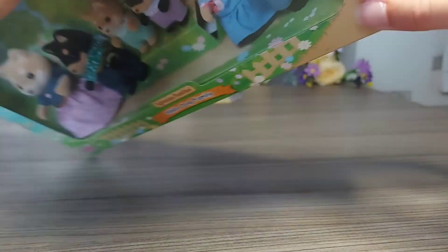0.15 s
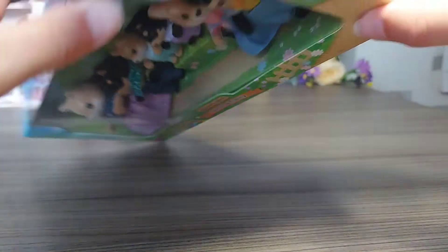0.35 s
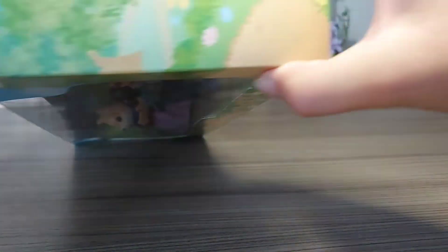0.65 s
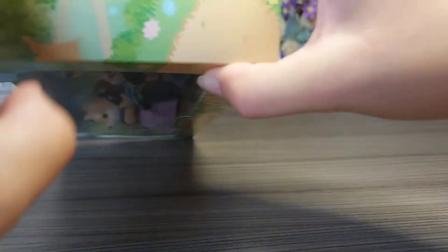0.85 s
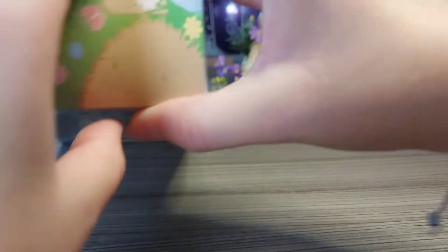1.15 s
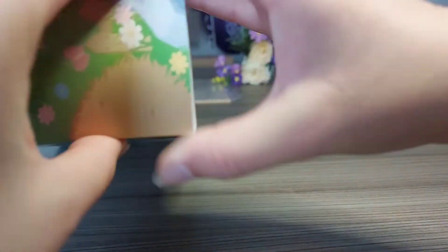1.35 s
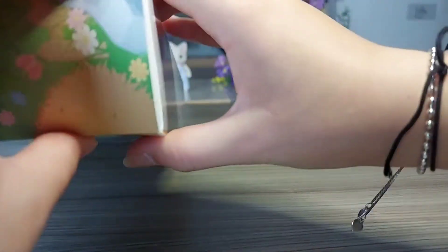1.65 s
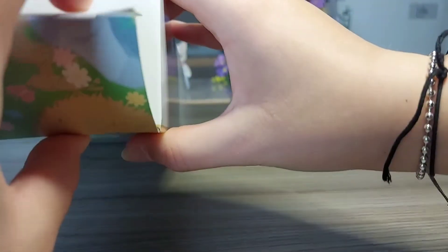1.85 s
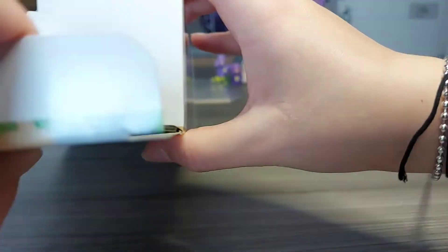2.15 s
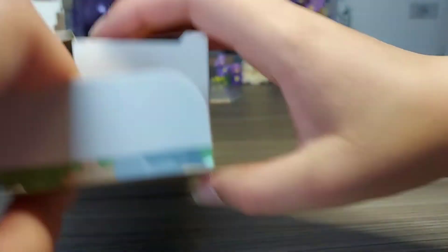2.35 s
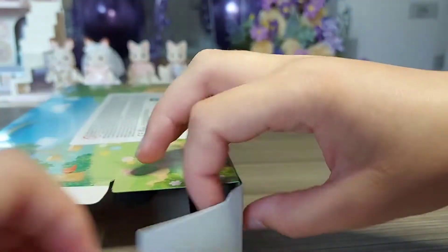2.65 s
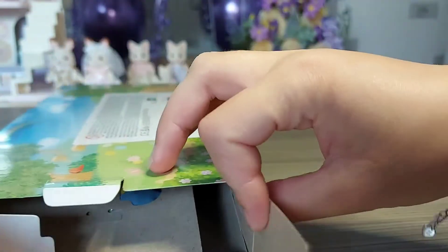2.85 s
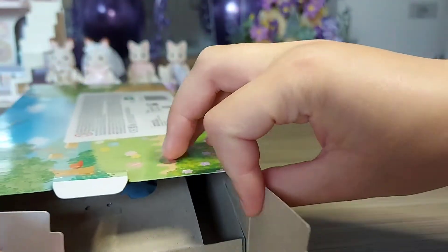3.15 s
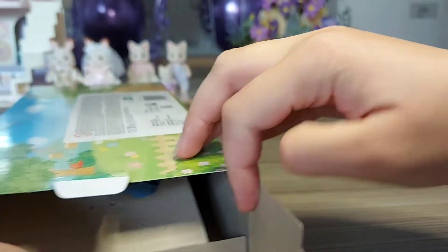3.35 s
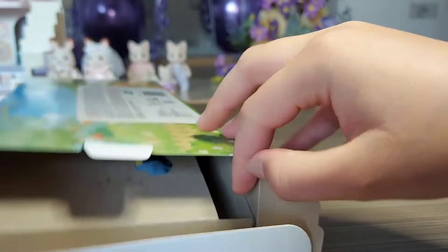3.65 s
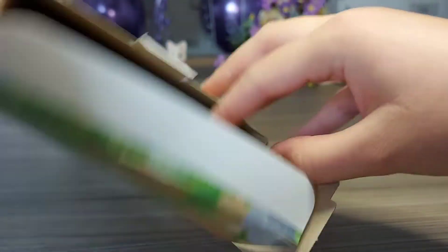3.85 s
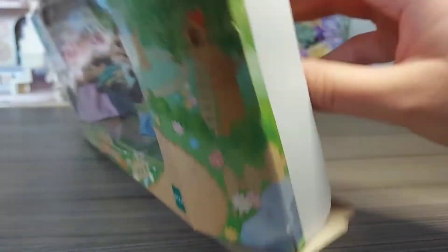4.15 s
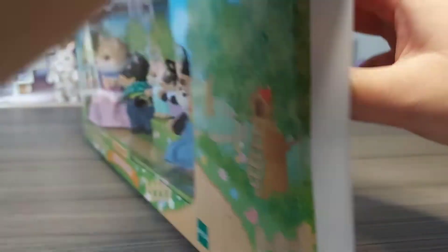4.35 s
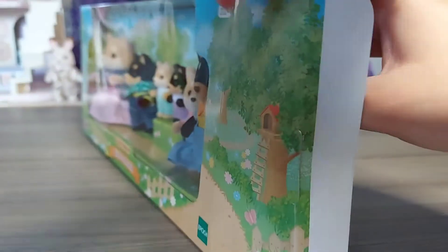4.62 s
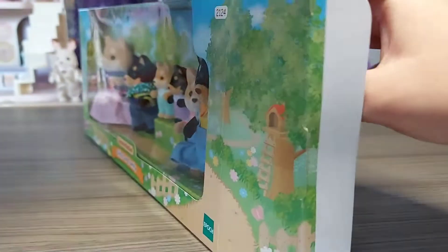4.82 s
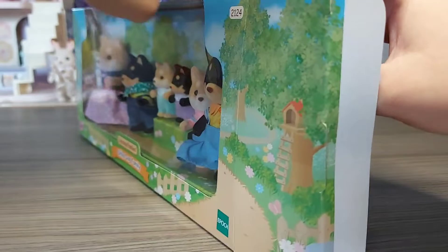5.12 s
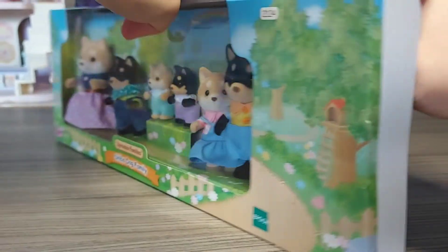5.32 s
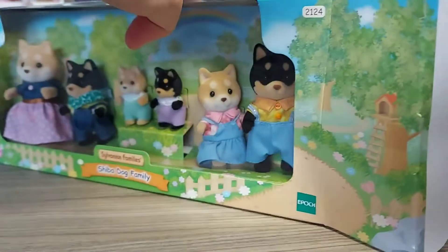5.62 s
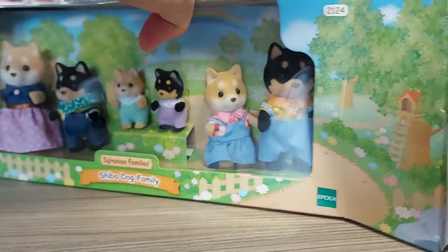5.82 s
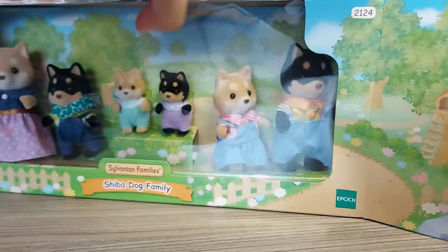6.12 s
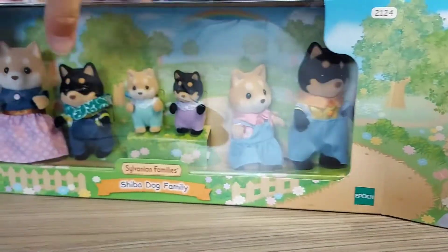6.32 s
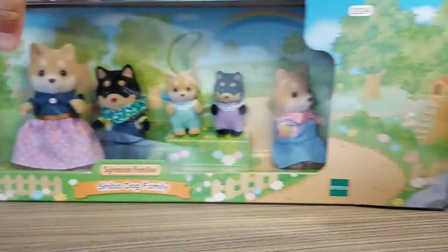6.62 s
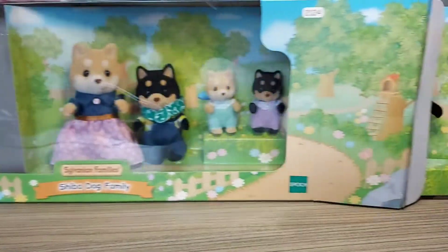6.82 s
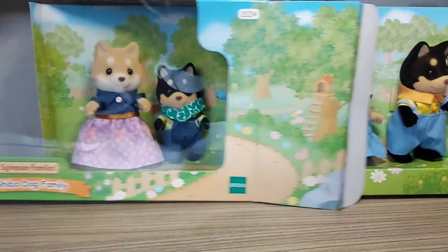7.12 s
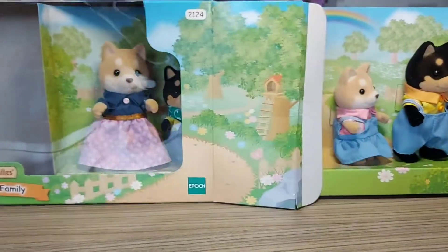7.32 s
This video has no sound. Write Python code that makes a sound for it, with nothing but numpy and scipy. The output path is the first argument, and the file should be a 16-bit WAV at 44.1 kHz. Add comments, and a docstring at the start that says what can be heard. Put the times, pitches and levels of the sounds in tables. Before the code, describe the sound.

Indoors at a wooden table, hands turn a thin hollow carton, flick its flaps and set it down. Dry papery scuffs, boxy thuds and bright plastic or card clicks come in uneven clusters with quiet gaps between. The strongest flurries come early, midway and late. The sound is near and crisp with a short room tail, wandering slightly from left of centre to right.

```python
"""A light cardboard box is handled on a wooden table close to a stereo microphone: hands turn it, open its flaps
and slide the tray out. Rubbing is random friction that rings the hollow box and the table top and hisses on card.
Knocks of edges, snaps of film and short scuffs are bursts of force through the same resonances, with bright snaps.
Behind them lie a short room made of feedback delays and a faint air noise."""
import sys
import numpy as np
from scipy import signal
from scipy.fft import rfft, irfft, next_fast_len
from scipy.io import wavfile

SR = 44100
rng = np.random.default_rng(int(sys.argv[2]) if len(sys.argv) > 2 else 0)


def generate_wav(signal):
    """Clip the signal to [-1, 1] and save it as 16-bit WAV at the path in sys.argv[1]."""
    frames = np.transpose(np.atleast_2d(signal))
    scaled = np.clip(frames, -1, 1) * 32767
    pcm = np.round(scaled).astype(np.int16)
    wavfile.write(sys.argv[1], SR, pcm)


N = 329427

# resonances of the hollow box: f/Hz, width/Hz, relative level/dB
BOX_MODES = [(181, 68, -2.5), (245, 144, -1), (330.6, 67, 3), (416, 38.6, -1.5), (512, 104, -4.5),
             (685, 109, -4), (832, 209, -5), (933, 102, 0), (1089, 192, -6), (1284, 154, 0),
             (1410, 288, -5.5), (1727, 387, -7), (2107, 700, -12.5)]
# resonances of the table top: f/Hz, width/Hz, relative level/dB
TABLE_MODES = [(64.2, 10.4, -10), (101, 51, -6), (151, 49, -5.5)]


def rubbing():
    """Friction sounds at once in the box walls, on the coated card, as fine hiss and in the table."""
    # coated card and tray: f/Hz, relative level/dB per Hz
    card_spectrum = [(900, -19), (1600, -11.5), (2300, -1.5), (2800, -1), (3220, -0.4), (3700, -1),
                     (4300, 0.5), (5300, -3.5), (7000, -9.5), (16000, -69)]
    # fine hiss: f/Hz, relative level/dB per Hz
    hiss_spectrum = [(3000, -51), (5500, 5), (7000, -3.5), (15000, 3.5)]
    # a dragged flap edge favours one narrow band of the card's hiss:
    # from t/s, to t/s, from f/Hz, to f/Hz, width/Hz, level over the card/dB
    edge_drags = [(1.491, 1.837, 3253, 3160, 350, -5), (2.064, 2.224, 3180, 3190, 373, 5),
                  (2.634, 2.774, 2860, 3094, 445, 0.5), (2.701, 2.85, 3560, 3740, 507, -8),
                  (3.05, 3.082, 1940, 1900, 300, 7), (4.35, 4.415, 3830, 3900, 400, -9.5),
                  (5.202, 5.708, 4370, 4130, 450, -11)]
    # a whole wall sliding on the table drums in one band:
    # from t/s, to t/s, from f/Hz, to f/Hz, width/Hz, level over the box/dB
    wall_drags = [(0.033, 0.359, 616, 596, 340, 0.6), (2.18, 2.387, 549.5, 524, 287, -1),
                  (2.602, 2.74, 881, 888, 150, -5), (4.493, 4.598, 400, 391, 180, -3)]
    box_db, card_db, hiss_db, table_db, tilt_db = strokes()

    shake = rms_one(friction(2500, spread_db=1.5, lumpy_db=1.0, alike=0.81))
    ticks = from_db(-11.5) * rms_one(friction(70, spread_db=1.5, lumpy_db=3.0, alike=0.69))
    shake = shake + ticks
    # rubbing near an edge favours the high modes, the middle of a wall the low ones
    tilts = [np.clip(tilt_db, -9, 9) * np.log2(hz / 600) for hz, width, db in BOX_MODES]
    grip = patches(BOX_MODES, patchy_db=2.0, rate_hz=6)
    box = rms_one(ring(BOX_MODES, shake, grip + tilts)) + favoured(shake, wall_drags)

    surface = friction(12000, spread_db=0.5, lumpy_db=1.2, alike=0.014)
    # random slow unevenness of the card's hiss across fixed bands
    bands = [(hz, hz / 6, 0) for hz in np.geomspace(1700, 8000, num=11)]
    uneven = ring(bands, rms_one(surface) + ticks, patches(bands, patchy_db=2.0, rate_hz=12))
    card = rms_one(colour(uneven, card_spectrum)) + favoured(surface, edge_drags)
    hiss = rms_one(colour(surface, hiss_spectrum))

    drumming = friction(900, spread_db=1.5, lumpy_db=1.5, alike=0.88)
    table = rms_one(ring(TABLE_MODES, drumming, patches(TABLE_MODES, patchy_db=3, rate_hz=5)))
    return from_db(box_db) * box + from_db(card_db) * card + from_db(hiss_db) * hiss + from_db(table_db) * table


def strokes():
    """Adds the powers of all strokes to dB levels of walls, card, hiss and table; wall power weights the tilt."""
    # strokes of a hand, flap or wall: full strength at t/s, swell/s per 20 dB (at least 0.004),
    # hold/s (at least 0), fade/s per 20 dB (at least 0.02), box wall level/dB, card over box/dB,
    # fine hiss over card/dB, table over box/dB, tilt of the box tone/dB per octave
    hand_strokes = [(0.084, 0.7, 0.1, 0.5, -19.5, -21, 1, -11.5, -3.5),
                    (0.439, 0, 0.081, -0.04, -27, -20.5, -7, -7, -4),
                    (0.774, -0.05, 0.22, 0.14, -32, -9.5, -4.5, -4, -1),
                    (1.133, 0, 0.22, -0.1, -39, -12, 0.5, -14, -1),
                    (1.439, 0.03, 0.1, 2, -51, -24, 26.5, -1, -7),
                    (1.554, 0.0956, 0.0075, 0.4, -25.5, -18.5, 3, -25, 1),
                    (1.58, 0.07, 0.026, 0.28, -22, -4.5, -10, -36, 1),
                    (1.615, 0.0562, 0.06, 0.05, -16.5, -6, -2, -39, 1.5),
                    (1.791, -0.06, 0.012, 0.15, -29, -3.5, -4.5, -35, 5.5),
                    (2.14, 0.06, 0.081, 0, -36.5, -7, 3.5, -23, -3.5),
                    (2.303, 0.12, 0.054, 1, -34.5, -12.5, 0.5, -3, -1),
                    (2.46, 0.005, 0.0063, 0.3, -25, -12, -2, -39, 2),
                    (2.602, 0.17, 0.066, 0.24, -25.5, -5.5, -7.5, -7.5, 3),
                    (2.715, 0.22, 0.14, -0.06, -30, 1, -10.5, -25, 5.5),
                    (2.841, 0.33, 0.0049, 0.05, -34, -2, 5, -16, -12),
                    (2.913, 1.4, 0.017, 0.2, -40.5, -5, 1, -2, -1),
                    (3.068, 0.12, 0.031, 0.33, -36.5, -9, -0.5, -2.5, 3.5),
                    (3.363, 0.04, 0.016, 1, -35, 1.5, 0, -8, -4),
                    (3.552, 0.02, 0.017, 0.1, -24, -7.5, -9, -26, 2.5),
                    (3.792, 1.07, 0.29, 0.02, -39, -4.5, -5, -14, 0),
                    (3.952, 0.05, 0.03, 0.15, -30.5, -12.5, -8, -1, -2.5),
                    (4.172, -0.05, 0.065, -0.1, -41, -2, 0, -18, 0.5),
                    (4.275, 0.04, 0.022, 0, -28, -9, -31, -7, 1.5),
                    (4.335, 0.13, 0.075, 0.07, -26, -5, -8, -9, 1),
                    (4.492, 0.04, 0.085, 0.11, -29, -4, -6, -10, 2),
                    (4.809, -0.1, 0.03, 0.1, -50, -0.5, -1, -16.5, -5),
                    (4.97, 0.07, 0.032, 0.15, -43, -5, -4, -1, -2),
                    (5.144, -0.03, 0.036, -0.3, -37, -8, -12, 4.5, -9),
                    (5.235, 0.1038, 0.017, 0.5, -18, -9.5, -12, -16, 0.5),
                    (5.289, 0.12, 0.056, 0.02, -23, -1, -8.5, -3, 2.5),
                    (5.459, 0.12, 0.036, -0.49, -20, -34, -22, -27.5, -4),
                    (5.551, 0, 0.055, 0.18, -26, 0.5, -6.5, -31, 2.5),
                    (5.867, 0.26, 0.033, 1.2, -39.5, -3.5, -6, -9, -2.5),
                    (6.5, 0.1, 0.068, 0.5, -37, -0.5, -17, -19, 3),
                    (6.574, 0.1847, 0.071, 0.37, -32, 0.5, -1, -19, 0),
                    (6.627, 0.0768, 0.066, 0.02, -18.5, -6.5, -7, -55, 2.5),
                    (6.695, 0.14, 0.21, 1.5, -30.5, -5.5, -4, -19, 2),
                    (7.13, 0.44, 0.18, -0.28, -27.5, -5.5, -9.5, -25, -0.5),
                    (7.384, 1, 0.036, -0.1, -41.5, -34, -7, -3.5, -7.5)]
    # hands merely holding the box: level/dB of walls, card, hiss, table
    resting_db = [-59, -62, -70, -80]
    fade_from_s, fade_db_per_s = 7.33, 154
    t = np.arange(N) / SR
    # near the end the resting sound and the earlier strokes fade out quickly
    fade_out = from_db(-fade_db_per_s * np.maximum(t - fade_from_s, 0))
    power = (from_db(resting_db)[:, None] * fade_out) ** 2
    tilted = 0
    for s, swell, hold, fade, box_db, card_db, hiss_db, table_db, tilt_db in hand_strokes:
        early = (s - t) / max(swell, .004)
        late = (t - s - max(hold, 0)) / max(fade, .02)
        strength = from_db(-20 * np.maximum(0, np.maximum(early, late)))
        if s < fade_from_s:
            strength = strength * fade_out
        levels = from_db(box_db + np.array([0, card_db, card_db + hiss_db, table_db]))
        stroke = (levels[:, None] * strength) ** 2
        power = power + stroke
        tilted = tilted + tilt_db * stroke[0]
    return (*(10 * np.log10(power)), tilted / power[0])


def friction(per_s, spread_db, lumpy_db, alike):
    """Fibres catch and let go: uneven clicks, in lumps, partly from spots that each side hears differently."""
    sizes = from_db(spread_db * np.minimum(rng.exponential(1, (2, N)), 5)) * rng.standard_normal((2, N))
    caught = rng.random((2, N)) < per_s / SR
    mid, side = sizes * caught * from_db(lumpy_db * drift(31.0))
    alike = np.clip(alike, 0, 1)
    return np.sqrt(1 + alike) * mid + np.sqrt(1 - alike) * side * [[1], [-1]]


def favoured(force, bands):
    """The low part of the force is carried up to each gliding band while its drag lasts."""
    out, t = 0, np.arange(N) / SR
    for start, end, from_hz, to_hz, width_hz, db in bands:
        slow = signal.sosfilt(signal.butter(2, width_hz / 2, fs=SR, output="sos"), force)
        turns = np.cumsum(np.interp(t, [start, end], [from_hz, to_hz])) / SR
        dragging = np.interp(t, [start - .02, start, end, end + .02], [0, 1, 1, 0])
        out = out + from_db(db) * dragging * rms_one(slow * np.cos(2 * np.pi * turns))
    return out


def patches(modes, patchy_db, rate_hz):
    """Each mode or band is fed more or less from moment to moment, by a slow random drift of its own."""
    return np.array([patchy_db * drift(rate_hz) for mode in modes])


def contacts(rows, rise_share, apart, push):
    """Each contact is a burst of force that swells and dies: it rings box and table and leaves a bright snap."""
    push_s, rattle_cut_hz = 0.00027, 1580
    out, size = np.zeros((2, N + SR)), SR // 5
    t = np.arange(size) / SR
    soft = signal.butter(2, rattle_cut_hz, fs=SR, output="sos")
    # a first clean push over the grit
    first_push = push * t / push_s * np.exp(1 - t / push_s)
    for s, snap_db, box_db, table_db, centre_hz, t60, crack_db, snap_hz in rows:
        noise = rng.standard_normal((2, size))
        grip = rng.standard_normal(len(BOX_MODES))
        t60 = max(t60, .003)
        shape = (1 - np.exp(-t / (rise_share * t60))) ** 2 * from_db(-60 * t / t60)

        # the loose walls go on rattling dully after the contact
        rattle_fade = from_db(-11.0 - 60 * t / (0.03 + 2.5 * t60))
        rattle = signal.sosfilt(soft, noise[1]) * (1 - np.exp(-t / 0.00094)) * rattle_fade
        feeds_db = 2.0 * grip + near_centre(centre_hz, slope_db=6.5)
        box = ring(BOX_MODES, noise[0] * shape + first_push + rattle, feeds_db)

        # the table feels only the smooth swell, not the grit, and carries it unevenly to the two microphones
        table = np.array([ring(TABLE_MODES, shape, 6.2 * grip), ring(TABLE_MODES, shape, 2.0 * grip[::-1])])

        # film and flap edges beam their treble, so each side gets a share of its own
        grit = (noise[0] + apart * noise[1] * [[1], [-1]]) * shape
        # a hump at the snap's own pitch and a thin crack above it
        hump = resonate(resonate(grit, snap_hz, 0.64 * snap_hz), snap_hz, snap_hz / 2)
        snap = from_db(snap_db) * peak_one(hump)
        crack = from_db(snap_db + crack_db + 3.5) * peak_one(np.diff(grit, prepend=0))

        body = from_db(box_db + 8.0) * peak_one(box) + from_db(table_db + 3.0) * peak_one(table)
        at = round(s * SR)
        out[:, at:at + size] += body + snap + crack
    return out[:, :N]


def near_centre(centre_hz, slope_db):
    """The place of contact favours box modes near one pitch: dB per mode, falling per octave squared."""
    centre_hz = np.clip(centre_hz, 150, 2000)
    return np.array([-slope_db * np.log2(hz / centre_hz) ** 2 for hz, width, db in BOX_MODES])


def ring(modes, force, feeds_db):
    """The force goes through every mode, each fed with a strength of its own, in alternating sign."""
    total = 0
    for k, ((hz, width_hz, db), feed_db) in enumerate(zip(modes, feeds_db)):
        total = total + (-1) ** k * from_db(db + feed_db) * resonate(force, hz, width_hz)
    return total


def resonate(x, hz, width_hz):
    """One two-pole resonance with gain near 1 on its top."""
    r = np.exp(-np.pi * width_hz / SR)
    feed = (1 - r * r) / 2 * np.array([1, 0, -1])
    return signal.lfilter(feed, [1, -2 * r * np.cos(2 * np.pi * hz / SR), r * r], x + 1e-18)


def spaced(x):
    """The sound reaches the nearer microphone a little sooner, and each side has its own level."""
    # where the hands work: t/s, lead of the left microphone/ms, left over right level/dB
    hand_places = [(0, 0.16, 0.5), (.9, 0.17, 2), (1.7, 0.16, 1), (2.15, 0.26, 2.5), (2.6, 0.15, 0.7),
                   (3.1, 0.3, 4), (3.6, 0.17, 2), (4.0, 0.16, 2), (4.35, 0.075, 4), (5.53, 0.039, 1),
                   (6.0, -0.12, 0), (6.7, -0.16, -2), (7.47, 0.15, 0)]
    s, leads_ms, pans_db = np.transpose(hand_places)
    t, samples = np.arange(N) / SR, np.arange(N)
    # half the lead, in samples, goes to each side
    shift = np.interp(t, s, leads_ms) * SR / 2000
    pan_db = np.interp(t, s, pans_db)
    moved = [np.interp(samples + way * shift, samples, v) for way, v in zip((1, -1), x)]
    return from_db(np.array([pan_db, -pan_db]) / 2) * moved


def room(x):
    """Walls return the sound through six feedback delays a side, duller on every round."""
    t60_s, wall_cut_hz = 0.3, 6400
    size = next_fast_len(N + SR)
    turn = np.exp(-2j * np.pi * np.arange(size // 2 + 1) / size)
    dull = np.exp(-2 * np.pi * wall_cut_hz / SR)
    wall = (1 - dull) / (1 - dull * turn)
    out = np.zeros((2, size // 2 + 1), complex)
    for k, lag in enumerate((rng.uniform(.008, .035, size=12) * SR).astype(int)):
        loop = from_db(-60 * lag / SR / t60_s) * wall * np.exp(lag * np.log(turn))
        out[k % 2] += (-1) ** (k // 2) * loop / (1 - loop)
    return irfft(rfft(x, size) * out, size)[:, :N]


def room_air():
    """The quiet of the place: steady coloured noise, independent at each microphone."""
    # f/Hz, relative level/dB per Hz
    air_spectrum = [(18, -44), (30, -15), (311, -6), (1590, -5), (11700, -31), (14400, -17), (16000, -47)]
    return from_db(-69) * rms_one(colour(rng.standard_normal((2, N)), air_spectrum))


def drift(rate_hz):
    """Slow chance of rms 1: noise at a fortieth of the sample rate through two equal low-passes at rate_hz."""
    r = np.exp(-80 * np.pi * rate_hz / SR)
    slow = signal.lfilter([1], [1, -2 * r, r * r], rng.standard_normal(N // 40 + 2002))
    slow = slow[2000:]  # past the filter's start
    return np.interp(np.arange(N) / 40, np.arange(len(slow)), rms_one(slow))


def colour(x, spectrum):
    """Shapes along the last axis by points of f/Hz and level/dB, joined on a log frequency scale."""
    hz, db = np.transpose(spectrum)
    size = next_fast_len(N)
    bins_hz = np.arange(size // 2 + 1) * SR / size
    gain = from_db(np.interp(np.log(bins_hz + 1), np.log(hz), db, left=-60))
    return irfft(rfft(x, size) * gain, size)[..., :N]


def from_db(db):
    """Decibels to gain."""
    return 10 ** (np.asarray(db) / 20)


def rms_one(x):
    """Scales to rms 1."""
    return x / np.sqrt(np.mean(x ** 2) + 1e-20)


def peak_one(x):
    """Scales to peak 1."""
    return x / np.abs(x).max()


def scene():
    """Box and hands close to the microphone in a quiet room."""
    # both tables: t/s, snap peak level/dB, box level/dB (peak 8 dB above), table level/dB (peak 3 dB above),
    # favoured box f/Hz (kept to 150-2000), t60 of the contact/s, crack over snap/dB (3.5 dB added), snap f/Hz
    # sharp knocks of edges and snaps of film
    knock_rows = [(.4595, -6.5, -9, -17.5, 710, 0.036, -13, 1940),
                  (.7375, -10.5, -21, -43, 1430, 0.012, 1.5, 3320),
                  (.9007, -3.5, -7.5, -18, 1050, 0.03, -23, 2800),
                  (1.2204, -27, -26.5, -36, 1000, 0.0066, -1, 1840),
                  (1.7, -4, -14, -48, 800, 0.008, -10, 3230),
                  (1.7485, -3, -15, -40, 1200, 0.017, -21, 3150),
                  (1.806, -11, -16, -26, 900, 0.004, -15, 1300),
                  (2.4563, -11, -19, -40, 800, 0.012, -7, 2260),
                  (2.5472, -8, -15, -29, 500, 0.035, -5.5, 2300),
                  (2.5668, -6, -11, -11.5, 500, 0.03, -37, 2670),
                  (2.885, -21.5, -27, -42, 880, 0.022, -18, 1890),
                  (3.0385, -21, -26, -30, 1300, 0.016, -30, 2230),
                  (3.5461, -13.5, -21.5, -63.5, 1280, 0.024, -11.5, 3020),
                  (3.625, -7.5, -16, -21, 246, 0.017, -2.5, 2680),
                  (3.935, -24.5, -33, -51, 1000, 0.021, -8, 1990),
                  (4.397, -15, -19, -32, 805, 0.032, -20, 3800),
                  (4.4325, -21, -19, -38, 1250, 0.025, -20, 2500),
                  (5.0364, -27.5, -47, -57.5, 385, 0.028, -17, 2360),
                  (5.1775, -16, -11, -23, 500, 0.075, -27, 1300),
                  (5.4347, -9, -5.5, -21.5, 1110, 0.045, -26, 2070),
                  (5.5303, 1, -47.5, -35, 306, 0.0041, -6, 3700),
                  (6.0289, -28, -24.5, -50, 570, 0.034, -22, 1520),
                  (6.679, -9, -15.5, -14.5, 400, 0.053, -19, 2130)]
    # short scuffs, where a flap or finger slips and grips again
    scuff_rows = [(.36, -48.5, -25, -14, 286, 0.012, -7, 1920),
                  (.757, -16.5, -27, -35, 890, 0.031, -12, 3480),
                  (.874, -20, -24, -43, 850, 0.037, -22, 3250),
                  (.9105, -8.5, -13, -32, 880, 0.021, -25, 1690),
                  (1.178, -38.5, -49, -52, 900, 0.071, 4, 4530),
                  (1.2326, -31, -27.5, -33, 630, 0.029, -10, 1800),
                  (1.518, -5, -16, -37, 1010, 0.042, -9.5, 3570),
                  (1.568, -8, -10.5, -32, 1370, 0.035, -6, 3700),
                  (1.635, -7, -17, -38, 450, 0.07, -20, 3250), (1.737, -6, -20, -39, 800, .04, -4, 5200),
                  (1.7554, -3, -13.5, -24, 1420, 0.017, -42, 3030),
                  (2.1162, -17.5, -38.5, -40, 306, 0.032, -7, 3160),
                  (2.1894, -22.5, -29, -55, 540, 0.076, -10, 3100),
                  (2.2898, -40.5, -29, -27.5, 378, 0.17, 4.5, 2330),
                  (2.473, -20, -18, -36, 990, 0.02, -3, 2000),
                  (3.156, -22.5, -33, -52, 1330, 0.08, -19, 2240),
                  (3.196, -30, -28.5, -44, 288, 0.02, -23, 2440),
                  (3.346, -17.5, -26, -58, 1350, 0.09, -6, 2560),
                  (3.376, -11.5, -16.5, -41, 1230, 0.034, -38, 2980),
                  (3.514, -21, -28.5, -67, 1110, 0.053, -17, 2480),
                  (3.622, -2, -17, -38, 900, 0.049, -13.5, 2540),
                  (3.866, -25, -31.5, -38.5, 1010, 0.023, -15, 2060),
                  (4.251, -23, -25, -39, 955, 0.044, -18, 2270),
                  (4.485, -18, -28, -50, 400, 0.08, -10, 3860),
                  (4.609, -13, -34, -40, 347, 0.035, -4, 3900),
                  (4.625, -19, -22, -27, 650, 0.025, -20, 2300),
                  (5.3297, -19, -24, -17.5, 430, 0.026, -11, 2820),
                  (5.918, -41.5, -34.5, -39, 410, 0.034, -7, 2300),
                  (6.072, -28.5, -38, -42, 500, 0.03, -16.5, 2280),
                  (6.1534, -38, -26.5, -31.5, 293, 0.02, -13, 2340),
                  (6.3752, -34, -31.5, -29, 394, 0.015, -8, 2880),
                  (6.608, -10.5, -28, -36, 1320, 0.043, -5, 3300),
                  (6.6473, -6.5, -15.5, -15, 537, 0.02, -8.5, 2720),
                  (7.36, -34, -27, -30, 490, 0.0082, -18, 1920)]
    knocks = contacts(knock_rows, rise_share=.015, apart=.55, push=1.06)
    scuffs = contacts(scuff_rows, rise_share=.2, apart=.75, push=0)
    near = rubbing() + knocks + scuffs
    # close to the microphone the bass is nearly all direct sound
    sent = signal.sosfilt(signal.butter(1, 183, "high", fs=SR, output="sos"), near.mean(axis=0))
    return spaced(near) + from_db(-13.5) * room(sent) + room_air()


def record(dry):
    """The microphone colours the sound, peaks are rounded, the deepest bass and the top are cut."""
    # f/Hz, level/dB
    microphone_response = [(25, 4), (55, -1.5), (6000, 0.97), (8200, 8.5), (9000, 12), (11600, 10),
                           (13200, 6), (15300, 3), (16000, -25)]
    rounded = np.tanh(colour(dry, microphone_response))
    lean = signal.sosfilt(signal.butter(3, 38, "high", fs=SR, output="sos"), rounded)
    return signal.sosfilt(signal.cheby2(12, 70, 16500, fs=SR, output="sos"), lean)


dry = scene()
out = record(dry)
generate_wav(out)
```